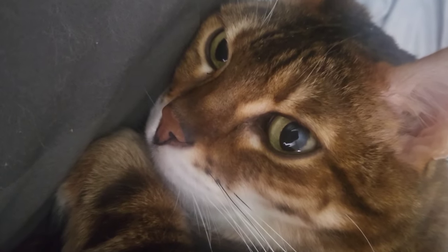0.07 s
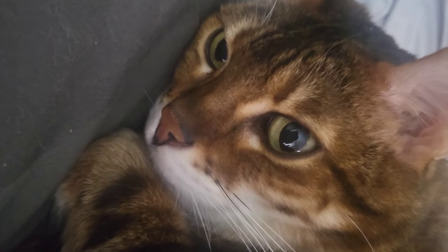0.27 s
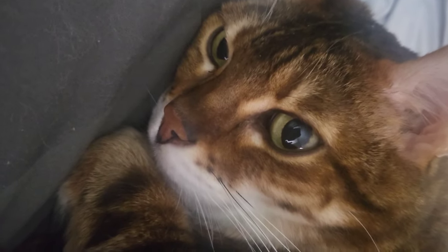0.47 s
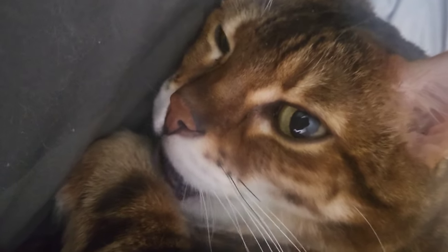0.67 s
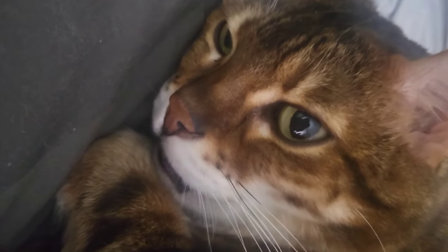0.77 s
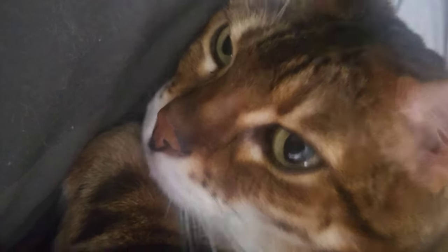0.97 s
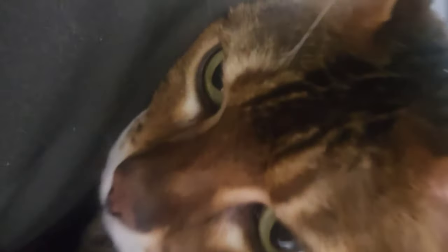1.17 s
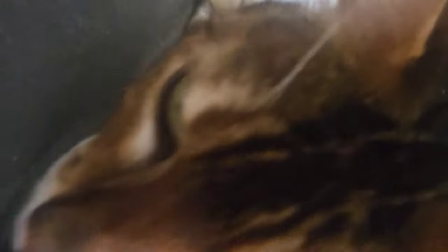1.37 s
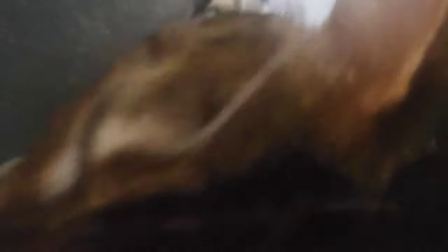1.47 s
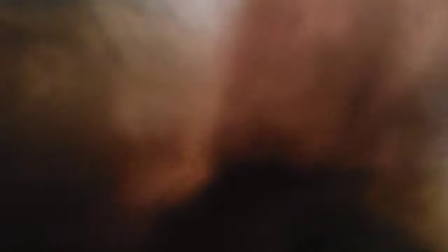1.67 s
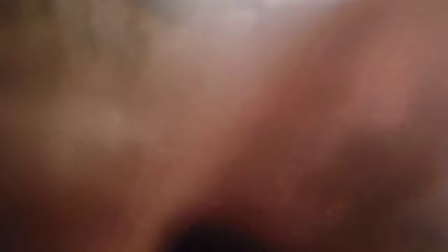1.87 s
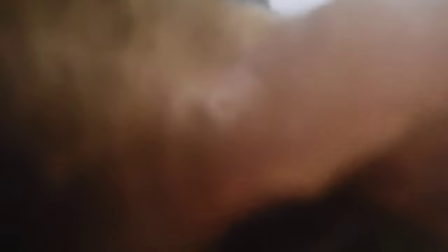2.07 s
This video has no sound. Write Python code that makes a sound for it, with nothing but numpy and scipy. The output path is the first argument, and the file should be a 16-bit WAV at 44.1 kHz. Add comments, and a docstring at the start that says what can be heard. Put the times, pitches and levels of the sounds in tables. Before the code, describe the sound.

One brief cat meow, close and bright, sinking to a small creaky end, preceded by a quiet high chirp and followed by soft padded knocks on the phone case, over faint room air and handling rumble.

```python
"""A cat meows close to a hand-held phone in a quiet room: fold harmonics through two moving mouth resonances,
the pitch rising and falling as the mouth opens and closes, with three catches in the voice.
Before it come lip smacks (short damped rings) and a chirp (a wavering tone in a puff of filtered noise).
Later the head bumps the phone and rings its case. Noise-made room air and hand rumble and a faint
two-tone hum lie underneath; the cat has a short, quiet room echo."""
import sys
import numpy as np
from scipy import signal
from scipy.fft import rfft, irfft, next_fast_len
from scipy.io import wavfile
from scipy.ndimage import uniform_filter1d, map_coordinates

SR = 44100
rng = np.random.default_rng(int(sys.argv[2]) if len(sys.argv) > 2 else 0)


def to_wav(sig):
    """Store sig (one row per channel, or 1-D mono) as 16-bit WAV at the path in sys.argv[1].

    Samples outside -1..1 are clipped; the rate is SR.
    """
    pcm = np.clip(np.atleast_2d(sig), -1, 1) * 32767
    pcm = np.round(pcm).astype(np.int16)
    wavfile.write(sys.argv[1], SR, pcm.T)  # frames by channels


def undo_db(level):
    """Turn decibels back into plain size, where 20 dB means ten times bigger."""
    steps = np.asarray(level, float) / 20
    return 10 ** steps


N = 92830

# the meow's melody and strength: [t/s, pitch f/Hz, level/dB before a final 0.5 dB cut]
MEOW_MELODY = [(0.636, 457, -89.5), (0.644, 443.1, -49), (0.674, 503.4, -37.5), (0.686, 462.1, -30.5),
               (0.76, 550.4, -23), (0.83, 561.3, -23), (0.872, 540.7, -22.5), (0.898, 518.2, -22),
               (0.93, 479, -28), (0.976, 450.7, -27.5), (1.0, 430.3, -34.5), (1.038, 388.4, -37),
               (1.048, 410, -36), (1.11, 363.3, -36.5), (1.126, 322.3, -42.5), (1.15, 336, -68)]
# moving mouth: [t/s, first resonance f/Hz, second resonance f/Hz, second over first level/dB,
# treble level/dB, left over right level/dB]
MOUTH_SHAPE = [(.64, 730, 1990, -34, -41.5, -2.5), (.672, 880, 2410, -21, -46, 11.5),
               (.69, 1037, 2400, -4, -33, 4.5), (.72, 1120, 2420, 3.5, -32, 5.5),
               (.76, 1160, 2376, 5, -22.5, 4.5), (.8, 1147, 2010, 6, -20, 7), (.83, 1180, 1794, 1, -25, 3),
               (.855, 1070, 1744, -5.5, -30, 10.5), (.87, 1130, 2450, -3, -46.5, 2),
               (.91, 1000, 2690, -20, -54.5, 7), (.94, 896, 2440, -28, -58.5, 2),
               (.975, 894, 1910, -17, -59.5, 8), (1.01, 718, 1320, -21.5, -63, 4),
               (1.06, 466, 1167, -5, -66.5, 6.5), (1.11, 400, 1280, 4, -60.5, 3),
               (1.15, 354, 1050, -8, -74, 5)]
FIRST_WIDTH_HZ, SECOND_WIDTH_HZ = 130, 486
MOUTH_TOP_HZ, MOUTH_TOP_STEEP = 2800, 8  # roll-off above both resonances
# plain fundamental beside the resonances: [t/s, level/dB]
PLAIN_FUNDAMENTAL = [(.64, -8), (.69, -16.5), (.8, -7.5), (.89, -15), (.97, -21.5), (1.02, -23),
                     (1.15, -14.5)]
# colour of the overtones above 2600 Hz: [f/Hz, level/dB]
TREBLE_COLOUR = [(2800, -7.5), (3600, -9), (5500, -16.5), (6700, -3), (7800, -14.5), (8600, -37.5),
                 (11000, -43), (15000, -45.5)]
# a high nasal ring, weaker as the pitch sinks below NASAL_FULL_HZ; the width is that before cubing
NASAL_HZ, NASAL_WIDTH_HZ, NASAL_DB = 7593, 620, -36
NASAL_DB_PER_HZ, NASAL_FULL_HZ = 0.4, 512.4
JITTER, SHIMMER_DB = 0.0037, 0.8  # pitch (as a fraction) and level unsteadiness
UNEVEN_DB, UNEVEN_RATE = 2.5, 25  # each overtone above the second wavers alone; knots per second
# catches, where the folds close and snap open: [t/s, depth level/dB, closing time t/s]
VOICE_CATCHES = [(0.869, -9, 0.012), (1.043, -2.5, 0.0032), (1.121, -13.5, 0.0056)]
# wet clicks and catches in the meow, before filtering: [t/s, nominal peak level/dB, f/Hz, t60 t/s]
WET_CLICKS = [(.664, -37.5, 2980, 0.0072), (.675, -27.5, 3360, 0.0035), (.8684, -19.5, 1360, 0.0077),
              (.8685, -28.5, 2550, 0.006), (1.044, -35, 905, .008), (1.124, -39.5, 814, 0.016)]
BREATH_DB = -34  # low breath under the voice
# high breath through the mouth: [t/s, level/dB]
MOUTH_HISS = [(.655, -83), (.68, -56), (.7, -62.5), (.75, -69.5), (.83, -73), (.855, -56.5), (.885, -56.5),
              (.91, -70), (.95, -103)]
# its spectrum: [f/Hz, level/dB]
MOUTH_HISS_COLOUR = [(1000, -83), (2000, -17.5), (3000, 6.5), (6000, -4.5), (7600, 0.5), (9600, -17),
                     (11000, -6.5), (13000, -28.5), (15000, -10)]
HISS_UNALIKE = 0.75  # separate noise at each port, against 1 of shared noise
# the meow at the two microphone ports, left over right: [f/Hz, level/dB]
PORT_BALANCE = [(300, 0), (550, 0), (1100, -2.5), (1650, 1), (2200, 4.5), (3000, 1), (5000, -2), (8000, -3)]
# phase by which the left port leads: [f/Hz, phase/rad]
PORT_LEAD = [(0, 0), (550, .8), (1100, 1.7), (1700, 1.9), (2200, 1.75), (2800, 2.2), (4000, 4), (6000, 8),
             (8300, 13), (16000, 25)]

# chirp whistle: [t/s, pitch f/Hz, level/dB]
CHIRP_WHISTLE = [(.13, 1626, -65), (.146, 1622, -55.5), (.16, 1681, -35), (.172, 1739, -36.5),
                 (.182, 1730, -31.5), (.195, 1735, -41), (.21, 1727, -35.5), (.226, 1776, -39),
                 (.24, 1806, -63)]
CHIRP_WAVER, CHIRP_FLUTTER_DB = 0.0016, 1.3  # pitch (as a fraction) and level unsteadiness
# breath around the chirp: [t/s, nose level/dB, upper level/dB, upper resonance f/Hz]
CHIRP_PUFF = [(.105, -90, -80, 2460), (.135, -68, -68, 2490), (.17, -53, -69, 2450), (.2, -45, -61, 2485),
              (.235, -61, -62, 2504), (.265, -55.5, -58.5, 2580), (.295, -64.5, -60.5, 2605),
              (.36, -77, -68, 2800), (.39, -75, -77, 2880), (.41, -87, -81, 3080), (.44, -95, -70, 3260),
              (.47, -91, -94, 3200)]
# nose resonances: [f/Hz, width before squaring f/Hz, level/dB]
NOSE_RESONANCES = [(1137, 38, 4.5), (1484, 880, -3), (1767, 30, 10)]
PUFF_UPPER_WIDTH_HZ = 210  # between the -6 dB points
# lip smacks: [t/s, nominal peak level/dB, f/Hz, t60 t/s]
LIP_SMACKS = [(.032, -60, 6200, 0.015), (.041, -57.5, 9940, 0.0044), (.046, -63.5, 8450, 0.0059),
              (.058, -72, 11600, .003), (.075, -54, 7600, 0.0021)]

# head against the phone: [t/s, peak level/dB, left over right level/dB, hardness level/dB per octave]
HEAD_BUMPS = [(1.783, -45.5, -6, 9.5), (1.927, -31.5, -3.5, 0), (1.958, -49.5, -5, 2.5),
              (1.998, -59, -7, -1)]
# ringing modes of the phone's case: [f/Hz, level/dB, t60 t/s]
CASE_MODES = [(298, 7, 0.024), (400, -4.5, 0.045), (497.5, -1, 0.024), (642, -10, 0.033), (1000, -21, 0.03),
              (1390, -21.5, 0.018), (2300, -28, 0.014)]
BUMP_RISE_S = 0.0062
# faint high case ticks just after the start of the loudest bump:
# [t/s, nominal peak level/dB, f/Hz, t60 t/s]
CASE_TICKS = [(1.93, -68.5, 4200, 0.034), (1.941, -69.5, 7400, .02)]

ROOM_DB = -21.5  # echo under the direct cat
# decay of the room: [f/Hz, t60 t/s]
ROOM_DECAY = [(1000, 0.3), (4000, 0.32), (12000, .2)]
# spectrum of the room air: [f/Hz, density level/dB, relative]
AIR_COLOUR = [(47, -38), (80, -7.5), (190, -8.5), (241, -4), (275, -7), (358, -5), (500, -11),
              (1100, -17.5), (1400, -18.5), (2000, -28), (2840, -36), (5500, -39), (6700, -33), (8000, -39),
              (15500, -37)]
# room air and bedding rustle: [t/s, level/dB]
AIR_LEVEL = [(0, -65), (.3, -62.5), (.6, -66), (1.15, -58), (1.27, -67), (1.42, -61.5), (1.6, -64.5),
             (1.85, -62.5), (2.1, -64.5)]
# left-right likeness of the air, held within -1 to 1 in use: [f/Hz, correlation]
AIR_LIKENESS = [(60, 0.65), (180, 0.8), (550, 0.71), (1650, -0.038), (4970, 0.38), (15000, -1.3)]
AIR_LEFT_LAG = 3  # samples
# faint hum: [f/Hz, level/dB before a 1.5 dB lift]
HUM_TONES = [(118, -78), (239, -70)]
# rumble of the holding hand: [t/s, level/dB]
HAND_LEVEL = [(0.0, -67.5), (0.09, -54), (.24, -53.5), (.29, -65), (0.51, -68.5), (0.55, -56.5),
              (.63, -54.5), (.78, -70), (1.15, -59), (1.26, -68.5), (1.45, -62), (2.1, -73)]
# its spectrum: [f/Hz, level/dB]
HAND_SPECTRUM = [(15, -37.5), (28, -10.5), (45, 0.5), (62, -5), (85, -25), (112, -11), (140, -18),
                 (200, -62)]


def unit(x):
    """Scale to rms 1."""
    return x / np.sqrt(np.mean(x ** 2) + 1e-20)


def along(points, hz):
    """Read (Hz, value) points on a log frequency axis."""
    f, value = np.transpose(points)
    return np.interp(np.log(np.abs(hz) + 1), np.log(f + 1), value)


def curves(rows):
    """One value per sample for each column after the time, then a soft-edged gate."""
    s, *columns = np.transpose(rows)
    t = np.arange(N) / SR
    inside = 1. * (t > s[0]) * (t < s[-1])
    return [np.interp(t, s, c) for c in columns] + [uniform_filter1d(inside, size=200)]


def wobble(rate):
    """A smooth random curve with rate knots a second."""
    knots = rng.standard_normal(int(N * rate / SR) + 4)
    return map_coordinates(knots, [np.arange(N) * rate / SR])


def noise(*shape):
    """White noise, N samples on the last axis."""
    return rng.standard_normal((*shape, N))


def filtered(x, response):
    """Multiply the spectrum of x by a complex response of frequency."""
    m = next_fast_len(N + SR // 2)
    return irfft(rfft(x, m) * response(np.fft.rfftfreq(m, 1 / SR)), m)[..., :N]


def peak(f, hz, width_hz):
    """A damped resonance of height 1."""
    return 1j * f * width_hz / (hz * hz - f * f + 1j * f * width_hz)


def placed(x, pan, lead):
    """Two microphone ports: pan(Hz) dB to the left, whose phase leads by lead(Hz) radians."""
    sides = np.array([[.5], [-.5]])
    return filtered(x, lambda f: undo_db(sides * pan(f)) * np.exp(1j * lead(f) * sides))


def pings(rows):
    """Short damped rings, each roughened by noise around its own frequency."""
    out, t = np.zeros(N + SR), np.arange(1500) / SR
    for s, db, hz, t60 in rows:
        rough = filtered(noise(), lambda f: peak(f, hz, hz))[:len(t)]
        ring = np.sin(2 * np.pi * hz * t) + 0.45 * rough
        out[round(s * SR):][:len(t)] += undo_db(db - 60 * t / t60) * ring
    return out[:N]


def mouth_harmonics(k, pitch, on):
    """Complex strength of each harmonic after the moving mouth and nose, scaled to rms 1 in sum."""
    first, second, second_db, treble_db = [c[on] for c in curves(MOUTH_SHAPE)[:4]]
    f = k * pitch
    plain = undo_db(curves(PLAIN_FUNDAMENTAL)[0][on]) * 1j * (k == 1)
    shape = peak(f, first, FIRST_WIDTH_HZ) + plain
    shape = shape - undo_db(second_db) * peak(f, second, SECOND_WIDTH_HZ)
    shape = shape / (1 + (f / MOUTH_TOP_HZ) ** MOUTH_TOP_STEEP)
    shape = shape / (1 + (f / (1.552 * first)) ** 3)
    # phases spread with k squared
    shape = shape + undo_db(treble_db + along(TREBLE_COLOUR, f)) * (f > 2600) * np.exp(-.35j * k * k)
    nasal_db = NASAL_DB + NASAL_DB_PER_HZ * np.minimum(pitch - NASAL_FULL_HZ, 0)
    shape = shape + undo_db(nasal_db) * peak(f, NASAL_HZ, NASAL_WIDTH_HZ) ** 3
    waver = np.array([wobble(UNEVEN_RATE)[on] for _ in k])
    shape = shape * undo_db(UNEVEN_DB * (k > 2) * waver)
    return shape / np.sqrt(np.sum(np.abs(shape) ** 2, axis=0) / 2)


def mouth_breath(phase):
    """Turbulent breath that swells once a fold cycle: a low band, and a two-port high hiss."""
    pulsed = noise(3) * (1 + .6 * np.cos(phase))
    low = unit(filtered(pulsed[0], lambda f: peak(f, 980, 1100) ** 2))
    ports = pulsed[0] + HISS_UNALIKE * pulsed[1:]
    high = unit(filtered(ports, lambda f: undo_db(along(MOUTH_HISS_COLOUR, f))))
    hiss_db, blowing = curves(MOUTH_HISS)
    return undo_db(BREATH_DB) * low, blowing * undo_db(hiss_db + 2.49 * wobble(60)) * high


def meow():
    """Vocal-fold harmonics and pulsed breath from a moving mouth, with catches and wet clicks."""
    pitch, level_db, gate = curves(MEOW_MELODY)
    pan_db = curves(MOUTH_SHAPE)[4]
    t = np.arange(N) / SR
    for s, depth_db, closing_s in VOICE_CATCHES:
        level_db = level_db + depth_db * (t < s) * np.exp(np.minimum(t - s, 0) / closing_s)
    level_db = uniform_filter1d(level_db, size=30)

    on = slice(int(MEOW_MELODY[0][0] * SR) - 200, int(MEOW_MELODY[-1][0] * SR) + 200)
    phase = 2 * np.pi * np.cumsum(pitch * (1 + JITTER * wobble(300))) / SR
    k = np.arange(1, 29)[:, None]  # harmonic numbers
    shape = mouth_harmonics(k, pitch[on], on)
    voice = np.zeros(N)
    voice[on] = np.sum(shape * np.exp(1j * k * phase[on]), axis=0).real

    low_breath, hiss = mouth_breath(phase)
    voice = (voice + low_breath) * gate * undo_db(level_db + SHIMMER_DB * wobble(150))
    voice += filtered(pings(WET_CLICKS),
                      lambda f: 1 / (1 + (600 / (f + 1)) ** 4) / (1 + (f / 6500) ** 6))
    ports = placed(voice, lambda f: along(PORT_BALANCE, f),
                   lambda f: np.interp(f, *np.transpose(PORT_LEAD)))
    return ports * undo_db(np.outer([.5, -.5], pan_db) - 0.5) + hiss


def chirp_whistle():
    """A sine with wavering pitch and fluttering level, slightly stronger on the right."""
    pitch, level_db, gate = curves(CHIRP_WHISTLE)
    phase = 2 * np.pi * np.cumsum(pitch * (1 + CHIRP_WAVER * wobble(230))) / SR
    whistle = np.sqrt(2) * gate * undo_db(level_db + CHIRP_FLUTTER_DB * wobble(186.3)) * np.sin(phase)
    return whistle * undo_db([[-.4], [.4]])


def chirp_puff():
    """Breath noise ringing in the nose and, moved onto a gliding sine, in a rising upper resonance."""
    nose_db, upper_db, upper_hz, gate = curves(CHIRP_PUFF)

    def nose_response(f):
        """Squared nose resonances under a treble roll-off."""
        rings = sum(undo_db(db) * peak(f, hz, width) ** 2 for hz, width, db in NOSE_RESONANCES)
        return rings / (1 + (f / 2100) ** 6)

    nose = unit(filtered(noise(), nose_response))
    band = unit(filtered(noise(), lambda f: 1 / (1 + (2 * f / PUFF_UPPER_WIDTH_HZ) ** 2)))
    rising = np.sqrt(2) * band * np.sin(2 * np.pi * np.cumsum(upper_hz) / SR)
    puff = gate * undo_db(1.8 * wobble(50)) * (undo_db(nose_db) * nose + undo_db(upper_db) * rising)
    balance = [(1100, 8.5), (1700, -6.5), (2500, -4)]  # f/Hz, left over right level/dB
    return placed(puff, lambda f: along(balance, f), lambda f: f / 1600)


def lip_smacks():
    """Wet lips part in tiny high damped rings, equal at both ports."""
    return pings(LIP_SMACKS)


def bumps():
    """Soft fur-padded blows ring the modes of the phone's case; harder ones ring brighter."""
    out, t = np.zeros((2, N + SR)), np.arange(SR // 10) / SR
    for s, db, pan_db, hard_db in HEAD_BUMPS:
        ring = np.zeros(len(t))
        for hz, mode_db, t60 in CASE_MODES:
            bright_db = hard_db * np.log2(hz / CASE_MODES[0][0])
            start_db = mode_db + bright_db + rng.normal(0, 3.0)
            ring += undo_db(start_db - 60 * t / t60) * np.sin(2 * np.pi * hz * t)
        ring *= (1 - np.exp(-t / BUMP_RISE_S)) ** 2
        ring /= np.abs(ring).max()
        out[:, round(s * SR):][:, :len(t)] += undo_db(db + np.array([[.5], [-.5]]) * pan_db) * ring
    return out[:, :N] + pings(CASE_TICKS)


def room_echo(x):
    """A noise tail in which each frequency dies at its own speed, starting 200 samples late."""
    hz, t, z = signal.stft(rng.standard_normal((2, SR // 2)), SR, nperseg=256)
    z = z * undo_db(-60 * t / along(ROOM_DECAY, hz)[:, None])
    tail = signal.istft(z, SR, nperseg=256)[1]
    tail = tail / np.linalg.norm(tail[0])
    return signal.fftconvolve(np.pad(x, (200, 0))[None], tail, axes=1)[:, :N]


def room_air():
    """Patchy coloured noise; the mix of mid and side sets how alike the ports are at each frequency."""
    def mid_side(f):
        """Air spectrum split by the angle that gives the wanted correlation."""
        turn = np.arccos(np.clip(along(AIR_LIKENESS, f), -1, 1)) / 2
        return undo_db(along(AIR_COLOUR, f)) * [np.cos(turn), np.sin(turn)]

    mid, side = filtered(noise(2), mid_side)
    ports = np.array([np.roll(mid + side, AIR_LEFT_LAG), mid - side])
    return undo_db(curves(AIR_LEVEL)[0] + 1.2 * wobble(27)) * ports / mid.std()


def hum():
    """Two low sines whose level and phase drift slowly."""
    out, t = np.zeros(N), np.arange(N) / SR
    for hz, db in HUM_TONES:
        out += undo_db(db + 1.5 + 1.3 * wobble(3.7)) * np.sin(2 * np.pi * hz * t + 0.22 * wobble(2.8))
    return out


def hand_rumble():
    """Low noise from the holding hand, mostly shared by the ports, with a little in opposite phase."""
    shared, opposed = filtered(noise(2), lambda f: undo_db(along(HAND_SPECTRUM, f)))
    ports = shared * undo_db([[.9], [-.9]]) + 0.19 * opposed * [[1], [-1]]
    return undo_db(curves(HAND_LEVEL)[0]) * ports / shared.std()


def scene():
    """The close cat and its echo, the bumps, and the quiet room behind."""
    cat = meow() + chirp_whistle() + chirp_puff() + lip_smacks()
    echo = undo_db(ROOM_DB) * room_echo(cat[0])
    return cat + echo + bumps() + room_air() + hum() + hand_rumble()


def low_pass(x):
    """Removes everything above the highest recorded frequency."""
    return signal.sosfilt(signal.butter(12, 15680, fs=SR, output="sos"), x)


def record(dry):
    """The phone takes down the finished mix."""
    return low_pass(dry)


dry = scene()
out = record(dry)
to_wav(out)
```